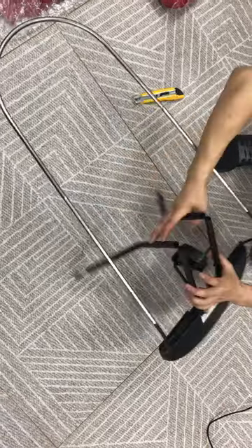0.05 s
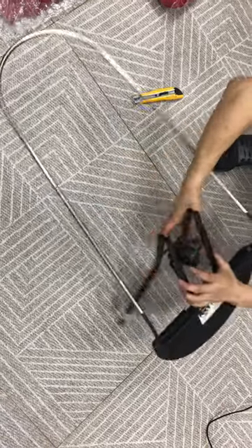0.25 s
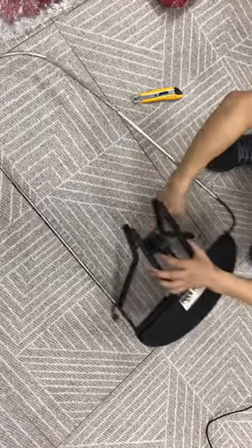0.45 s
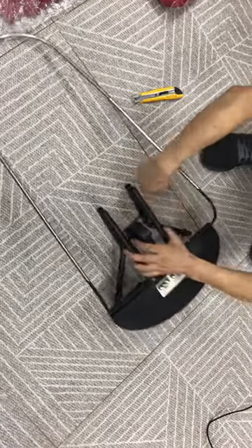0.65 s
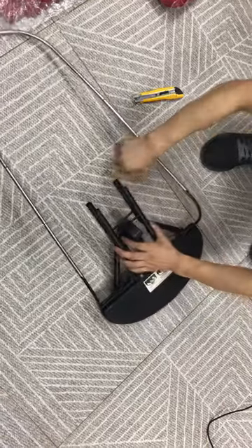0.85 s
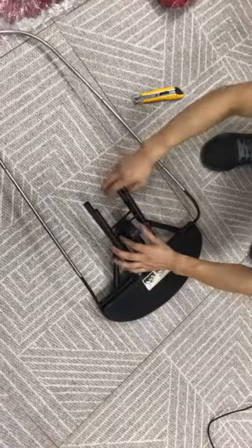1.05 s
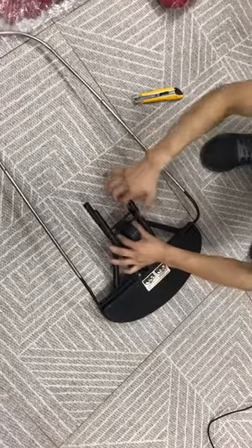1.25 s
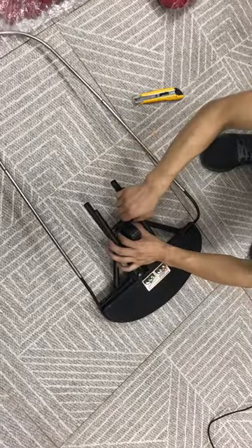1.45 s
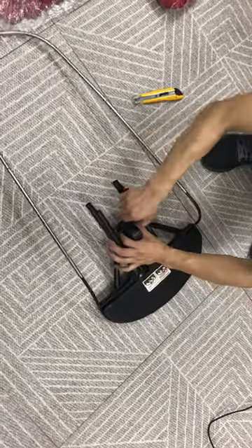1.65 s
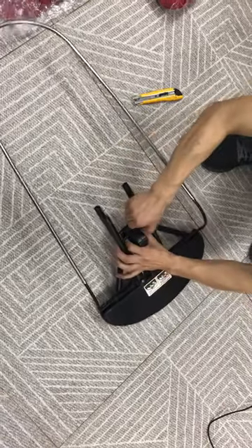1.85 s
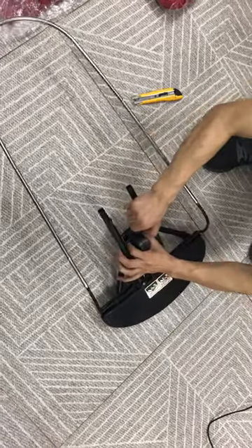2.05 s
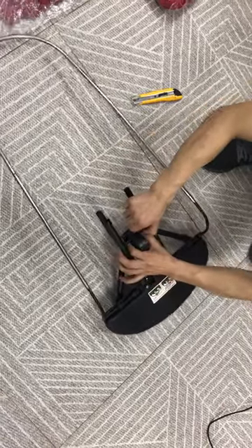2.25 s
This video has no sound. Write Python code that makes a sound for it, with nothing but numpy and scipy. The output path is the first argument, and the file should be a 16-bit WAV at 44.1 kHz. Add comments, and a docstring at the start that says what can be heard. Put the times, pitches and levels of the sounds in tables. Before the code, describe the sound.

Sharp clacks of a steel and plastic frame being folded by hand run from about 0.2 to 1 second, after a soft scrape, loudest near 0.3 and 0.6 seconds. A hinge briefly groans around 0.4. A tube slides softly from 0.7, fading by 1.4. Faint finger rubs, squeaks and ticks follow until about 2.2 seconds. The quiet room rings briefly, with low hum and ventilation underneath.

```python
"""A soft plastic scrape, then sharp clacks: the steel legs of a folding frame are swung shut by hand on a
carpet, knocking against each other and the plastic housing. A hinge sticks and slips into a groan, a long
tube sings as it slides, then fingers rub, squeak and tick on the parts.
The room is quiet, with a short ring; mains hum and ventilation lie underneath."""
import sys
import numpy as np
from scipy import signal
from scipy.fft import rfft, irfft, next_fast_len
from scipy.io import wavfile

SR = 44100
rng = np.random.default_rng(int(sys.argv[2]) if len(sys.argv) > 2 else 0)


def digitize_waveform(pressure):
    """Quantize a signal to 16-bit integers and store it at the path in sys.argv[1].

    Rows of a 2-D input are taken as channels; values are limited to [-1, 1].
    """
    field = np.atleast_2d(pressure).T
    bounded = np.clip(field, -1, 1)
    quanta = np.round(bounded * 32767).astype(np.int16)
    wavfile.write(sys.argv[1], SR, quanta)


N = 101429
T = np.arange(N) / SR


def from_db(db):
    """Decibels to gain."""
    return 10 ** (np.asarray(db) / 20)


def rms_one(x):
    """Scale to unit rms."""
    return x / np.sqrt(np.mean(x ** 2) + 1e-20)


def at_hz(points, hz):
    """Read a table on a log-frequency axis."""
    frequencies, values = np.transpose(points)
    return np.interp(np.log(hz + 1e-9), np.log(frequencies), values)


def envelope(s, db):
    """Gain over time, silent outside the points."""
    return from_db(np.interp(T, s, db, left=-150, right=-150))


def coloured(x, colour, tilt_db=0):
    """Give a steady signal a spectrum and a tilt per octave above 400 Hz; rms 1."""
    hz = np.maximum(np.fft.rfftfreq(len(x), 1 / SR), 10)
    octaves = np.log2(np.maximum(hz, 400))
    return rms_one(irfft(rfft(x) * from_db(at_hz(colour, hz) + tilt_db * octaves), len(x)))


def noise(colour, tilt_db=0, size=N):
    """Coloured noise of rms 1."""
    return coloured(rng.standard_normal(next_fast_len(size)), colour, tilt_db)[:size]


def drift(per_s):
    """Glide between random values of spread 1."""
    return np.interp(T * per_s, np.arange(N // 20), rng.standard_normal(N // 20))


def add(out, s, x):
    """Mix a sound in at a time in seconds."""
    start = int(max(s, 0) * SR)
    out[start:start + len(x)] += x[:max(N - start, 0)]


def high_pass(x, hz):
    """Thin out the lows: small parts radiate little bass."""
    return signal.sosfilt(signal.butter(2, hz, "high", fs=SR, output="sos"), x)


def clacks_and_ticks():
    """Each knock cracks and rings the housing, legs and brackets; finger ticks only crack."""
    # Parts knocking together. Each row: start in seconds, levels of housing, legs, brackets and crack
    # in dB, crack tilt in dB per octave, crack t60 in seconds, rise in seconds.
    knocks = [(0.2071, -52, -51.5, -53.5, -25, 2.1, 0.033, 0.000045),
              (.2098, -47, -50, -57, -27.5, -3.7, 0.014, 0.00012),
              (0.2149, -47, -47.5, -60, -36, 1, .02, 0.00022),
              (.318, -53.5, -46.5, -77.5, -59.5, -8, 0.036, 0.001),
              (0.3362, -23, -49, -54, -37, -2, 0.014, 0.00079),
              (.3395, -15, -41.5, -50, -24, 0, 0.042, 0.00051),
              (.3445, -34, -39, -48.5, -27, -3, 0.019, 0.00028),
              (0.4268, -38, -39, -60, -28, -3.5, .04, 0.00037),
              (.5749, -41.5, -20.5, -32, -13, 1.5, 0.026, 0.000078),
              (.5792, -46, -25.5, -41, -23.5, -1, 0.037, .0003),
              (.594, -55.5, -35, -46, -28.5, -1.5, 0.051, 0.0007),
              (0.6626, -48, -35, -36, -26, -0.95, .05, 0.00056),
              (.699, -63, -49, -66, -37, -2.5, 0.058, 0.00088),
              (0.9306, -36.5, -43.5, -65.5, -49, -4, 0.12, 0.00023),
              (0.9563, -32, -36, -55, -30.5, -0.6, 0.019, 0.000081),
              (0.9597, -44, -37, -72, -29.5, -6, .04, .0003),
              (0.9683, -34.5, -43.5, -67, -42, 10, 0.016, 0.00027)]
    # Ticks under the fingers. Each row: start in seconds, level in dB, tilt in dB per octave.
    ticks = [(0.16, -64, -6), (1.391, -63.5, 1.5), (1.474, -58.5, 1.5), (1.482, -62, -5.5), (1.606, -61, 9),
             (1.8119, -51.5, 5.5), (1.827, -58, 2), (1.864, -66, 2), (1.892, -65.5, 6), (2.0285, -60, 0.5),
             (2.155, -71, 6), (2.201, -54.5, -9.5)]
    # Modes of the plastic housing, the steel legs and the small steel brackets.
    # Each row: frequency in Hz, level in dB, t60 in seconds.
    housing_modes = [(190, -16, 0.076), (274, -6, 0.045), (340, -1, .025), (434, -7.5, 0.086),
                     (515, -13, 0.057), (686, -10.5, 0.052), (1116, -13, 0.043), (1398, -12, 0.042)]
    leg_modes = [(514, -8, 0.023), (550, -11.5, .09), (613, -7.5, 0.079), (750, -11.5, 0.11),
                 (797, -8, 0.072), (946, -1, 0.042), (1076, -9, .08), (1301, -7.5, 0.087), (1530, -6, .09),
                 (2009, -10.5, .07), (2300, -14.5, 0.1)]
    bracket_modes = [(2940, -10.5, 0.38), (3280, -12, 0.19), (3420, -7.5, 0.24), (4060, -8.5, .06),
                     (4700, -17, .2), (4845, -20, .15), (5260, 1.5, .06), (5320, -5, 0.095),
                     (6460, -13, 0.29), (6864, -17, 0.093), (7020, -15.5, 0.081), (8506, -14.5, .12),
                     (9300, -16.5, 0.059), (13000, -6.5, .05)]
    plastic, steel = np.zeros((2, N))
    for s, housing_db, legs_db, brackets_db, crack_db, tilt_db, t60, rise_s in knocks:
        add(plastic, s, from_db(housing_db) * ringing(housing_modes, rise_s))
        add(steel, s, from_db(legs_db) * ringing(leg_modes, rise_s))
        add(steel, s, from_db(brackets_db) * ringing(bracket_modes, rise_s))
        add(steel, s, from_db(crack_db) * crack(tilt_db, t60, rise_s))
    for s, db, tilt_db in ticks:
        add(steel, s, from_db(db) * crack(tilt_db, t60=0.02, rise_s=0.0001))
    return high_pass(plastic, hz=119) + high_pass(steel, hz=340)


def ringing(modes, rise_s, scatter_db=0.5):
    """Decaying modes of a struck body, excited a little differently by every blow."""
    t = T[:8192]
    hz, db, t60 = np.transpose(modes)[:, :, None]
    polarity = (-1) ** np.arange(len(hz))[:, None]
    gain = from_db(db - scatter_db * rng.standard_normal(hz.shape))
    phase = 2 * np.pi * hz * t + rng.uniform(0, np.pi / 2, hz.shape)
    partials = polarity * gain * from_db(-60 * t / t60) * np.sin(phase)
    return partials.sum(axis=0) * (1 - np.exp(-t / rise_s))


def crack(tilt_db, t60, rise_s):
    """A hard contact excites a crowd of short-lived modes, heard as a snap of noise."""
    # Colour of the contact. Each row: frequency in Hz, spectral density in dB.
    contact_colour = [(100, -15.5), (300, 1), (550, 6), (1400, 3.5), (2600, 1.5), (4000, 1), (5700, -2.5),
                      (9000, -3), (10300, -15), (11700, -7), (12200, -14), (13100, -4.5), (14200, -13.5)]
    burst = noise(contact_colour, tilt_db, size=4096)
    t = T[:len(burst)]
    return burst * from_db(-60 * t / t60) * (1 - np.exp(-t / rise_s))


def hinge_groan(pitch_jitter=0.13, flutter_db=2, overtone_db=-13.5):
    """Stick and slip in a joint makes a low, unsteady groan."""
    # Contour of the groan. Each row: time in seconds, pitch in Hz, level in dB.
    groan = [(.355, 265, -44.5), (.378, 277, -39), (.393, 335, -45.5), (.407, 360, -36.5), (.43, 320, -43),
             (.455, 255, -51), (.48, 220, -67.5)]
    s, hz, db = np.transpose(groan)
    pitch = np.interp(T, s, hz) * (1 + pitch_jitter * drift(per_s=250))
    phase = 2 * np.pi * np.cumsum(pitch) / SR
    tone = rms_one(np.sin(phase) + from_db(overtone_db) * np.sin(2 * phase))
    return envelope(s, db) * from_db(flutter_db * drift(per_s=120)) * tone


def friction_grains(per_s=2500, spread_db=2):
    """Friction as dense, tiny slips of uneven size."""
    size = next_fast_len(N)
    slips = (rng.random(size) < per_s / SR) * rng.standard_normal(size)
    return slips * from_db(spread_db * np.minimum(rng.exponential(1, size), 4))


def sliding(resonances, levels):
    """Sliding friction keeps the resonances of a part singing."""
    slips, song = friction_grains()[:N], 0
    for hz, width_hz, db in resonances:
        peak = signal.iirpeak(hz, hz / width_hz, fs=SR)
        ring = signal.lfilter(*peak, signal.lfilter(*peak, slips))
        song += from_db(db) * rms_one(ring)
    return envelope(*np.transpose(levels)) * rms_one(song)


def housing_scrape():
    """The housing gives a hollow scrape as the legs swing."""
    # Resonances of the scraped housing. Each row: frequency in Hz, width in Hz, level in dB.
    resonances = [(290, 22, -5), (397, 110, 0.5), (534, 63, -3), (650, 28, -6), (1170, 98, -13.5),
                  (1540, 53, -17.5)]
    # Envelope of the scrape. Each row: time in seconds, level in dB.
    levels = [(0, -45.5), (.035, -52.5), (.085, -49), (.12, -58), (.17, -72), (.26, -54), (.3, -59),
              (.38, -54), (.47, -59), (.55, -63.5)]
    return sliding(resonances, levels)


def tube_slide():
    """A long tube sings under friction as it slides, and fades away."""
    # Resonances of the tube. Each row: frequency in Hz, width in Hz, level in dB.
    resonances = [(454, 69, -10), (714, 66, -5.5), (1236, 120, 1), (1573, 180, -23), (2200, 290, -7),
                  (2363, 160, -10.5), (2690, 73, -10.5), (2930, 140, -9)]
    # Envelope of the slide. Each row: time in seconds, level in dB.
    levels = [(.7, -48.5), (.77, -50.5), (.82, -51), (.845, -55), (.93, -54), (1.019, -60), (1.16, -61),
              (1.33, -67.5), (1.45, -76)]
    return sliding(resonances, levels)


def finger_squeaks():
    """Fingers slip on the plastic in short, faint squeaks."""
    # Resonances of the squeak. Each row: frequency in Hz, width in Hz, level in dB.
    resonances = [(1013, 99, -1), (1302, 110, 0.5), (1586, 90, -2.5), (1952, 65, -2.5)]
    # Envelope of the squeaks. Each row: time in seconds, level in dB.
    levels = [(1.53, -78), (1.55, -62), (1.568, -63), (1.591, -81), (1.66, -79), (1.68, -65.5),
              (1.705, -71), (1.732, -56), (1.756, -78.5)]
    return sliding(resonances, levels)


def rubbing():
    """Hands and parts rub with a dull body and a fine hiss."""
    # Envelopes of the rub. Each row: time in seconds, body level in dB, hiss level in dB.
    levels = [(0, -65, -79), (.1, -69, -80), (.19, -79, -87), (.26, -66, -69), (0.498, -80, -72),
              (0.829, -61, -75), (0.909, -58.5, -65), (1.04, -51.5, -71), (1.12, -62, -73),
              (1.3, -66.5, -79.5), (1.52, -79, -84.5), (1.565, -65.5, -70), (1.63, -80, -83),
              (1.68, -64.5, -70), (1.73, -64, -72), (1.76, -73, -71.5), (1.88, -72.5, -70),
              (1.96, -76.5, -86), (2.3, -77, -81.5)]
    # Colours of the body and the hiss. Each row: frequency in Hz, spectral density in dB.
    body_colour = [(150, -18), (450, -4.5), (700, -1.5), (830, -2), (1000, -3.5), (1300, -1), (1450, -3.5),
                   (1600, -1), (1750, -6.5), (1960, -4), (2400, -9.5), (3500, -17.5), (8000, -40)]
    hiss_colour = [(500, -25), (2000, -3.5), (4000, 2), (6500, -3), (8800, -1), (10500, -10), (12300, 0),
                   (14000, -1.5)]
    s, body_db, hiss_db = np.transpose(levels)
    body = from_db(np.interp(T, s, body_db)) * coloured(friction_grains(), body_colour)[:N]
    hiss = from_db(np.interp(T, s, hiss_db)) * coloured(friction_grains(), hiss_colour)[:N]
    return body + hiss


def room(x, early_db=-11, early_t60_s=0.18, predelay_s=0.005):
    """The room returns a quick cluster of early echoes and a tail that dies band by band."""
    # Decay of the tail. Each row: frequency in Hz, t60 in seconds.
    tail_t60 = [(150, 1), (500, 0.35), (1500, 0.72), (4000, 0.95), (8000, 0.3), (13000, 1)]
    # Colour of the tail. Each row: frequency in Hz, level in dB.
    tail_db = [(150, -14), (500, -8.5), (1500, -9.5), (4000, -9.5), (8000, -9), (13000, -23.5)]
    t, hz = T[:SR], np.fft.rfftfreq(SR, 1 / SR)
    white, edges_hz = rfft(rng.standard_normal(SR)), np.geomspace(60, 16000, 15)

    def decay(t60):
        """Exponential fade of unit energy."""
        return from_db(-60 * t / t60) * np.sqrt(2 * np.log(1000) / (t60 * SR))

    echoes = from_db(early_db) * rng.standard_normal(SR) * decay(early_t60_s)
    for low, high in zip(edges_hz, edges_hz[1:]):
        centre = np.sqrt(low * high)
        band = irfft(white * (hz >= low) * (hz < high), SR)
        echoes += from_db(at_hz(tail_db, centre)) * band * decay(at_hz(tail_t60, centre))
    reverb = np.zeros(N)
    add(reverb, predelay_s, signal.fftconvolve(x, echoes))
    return reverb


def mains_hum(waver_db=1.5):
    """Low mains hum, each partial wavering slightly in level."""
    # Partials of the hum. Each row: frequency in Hz, rms level in dB.
    partials = [(59.6, -71.5), (119.6, -65), (177.6, -67), (334, -72.5)]
    hum = np.zeros(N)
    for hz, db in partials:
        gain = np.sqrt(2) * from_db(db + waver_db * drift(per_s=2.7))
        hum += gain * np.sin(2 * np.pi * (hz * T + rng.random()))
    return hum


def ventilation(level_db=-60):
    """Moving air lays down a steady, dark bed of noise."""
    # Colour of the air. Each row: frequency in Hz, spectral density in dB.
    air_colour = [(15, -53), (25, -22), (54, -2), (87, -16), (113, -1.5), (147, -7), (177, -3), (301, -8.5),
                  (485, -15), (1050, -22.5), (1870, -38.5), (14000, -48.5)]
    return from_db(level_db) * noise(air_colour)


def scene():
    """The folding frame in its room, over hum and ventilation; mono."""
    friction = hinge_groan() + housing_scrape() + tube_slide() + finger_squeaks() + rubbing()
    frame = clacks_and_ticks() + friction
    return (frame + room(frame) + mains_hum() + ventilation())[None]


def record(dry):
    """Soft clipping rounds the highest peaks, then a steep low-pass cuts the top treble."""
    ceiling, cutoff_hz = 0.81, 14000
    rounded = ceiling * np.tanh(dry / ceiling)
    return signal.sosfilt(signal.ellip(10, 0.3, 70, cutoff_hz, fs=SR, output="sos"), rounded)


dry = scene()
out = record(dry)
digitize_waveform(out)
```